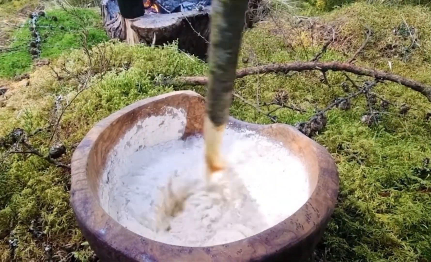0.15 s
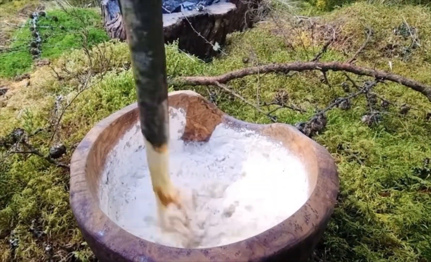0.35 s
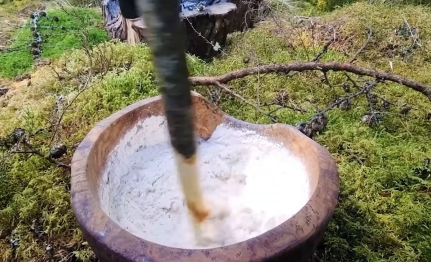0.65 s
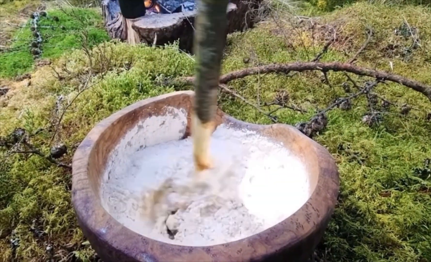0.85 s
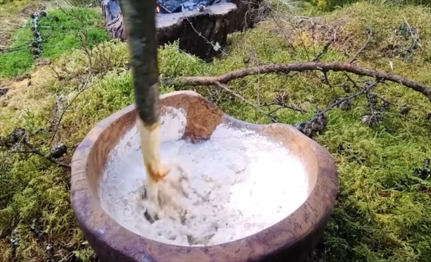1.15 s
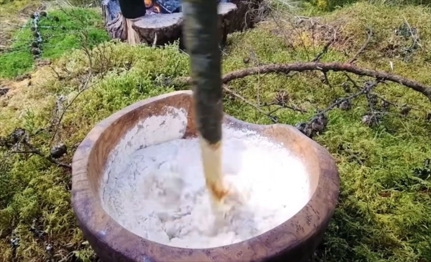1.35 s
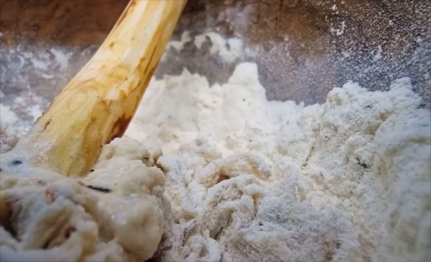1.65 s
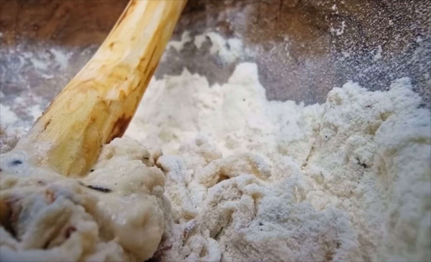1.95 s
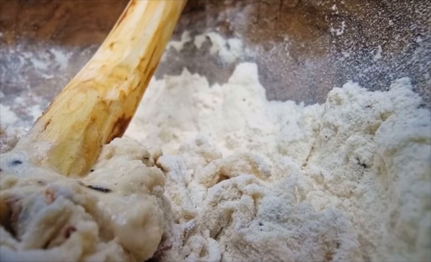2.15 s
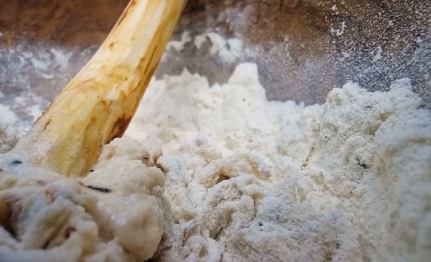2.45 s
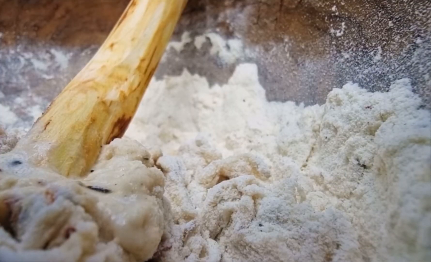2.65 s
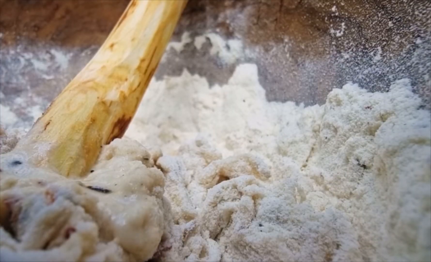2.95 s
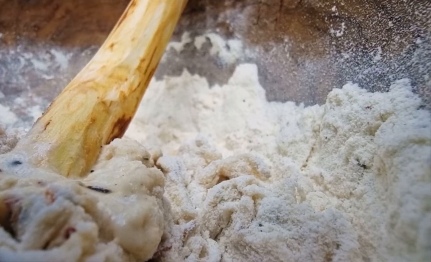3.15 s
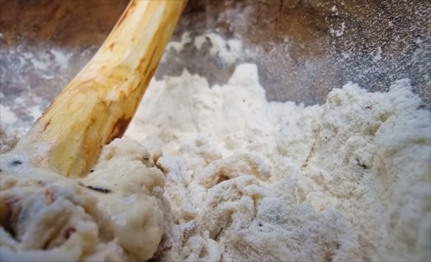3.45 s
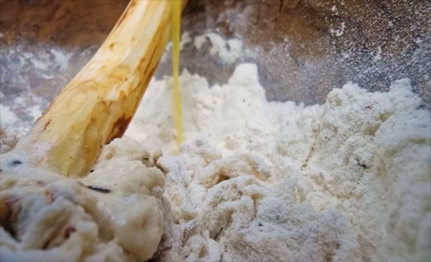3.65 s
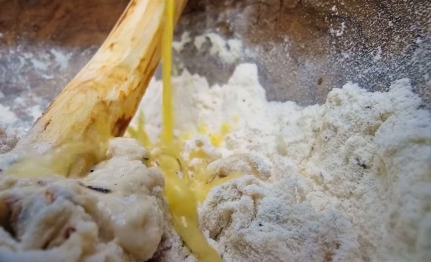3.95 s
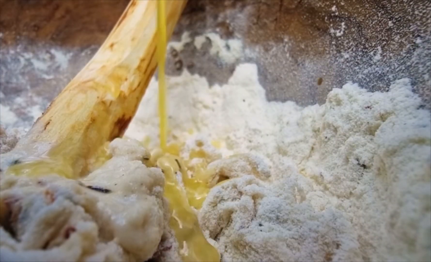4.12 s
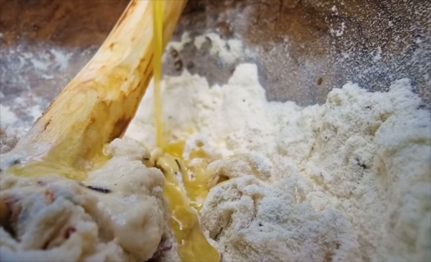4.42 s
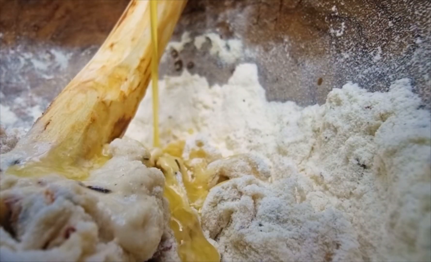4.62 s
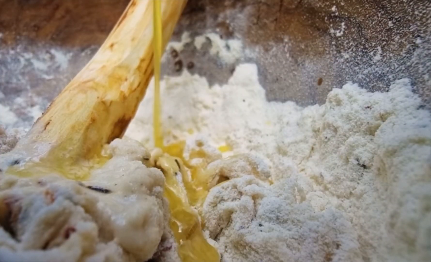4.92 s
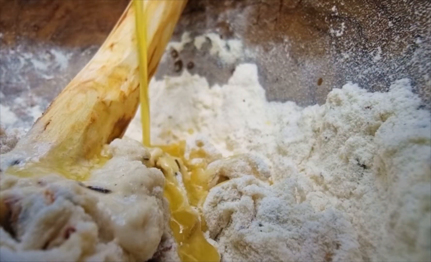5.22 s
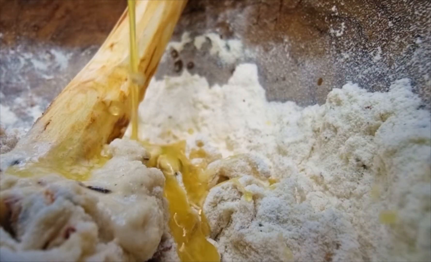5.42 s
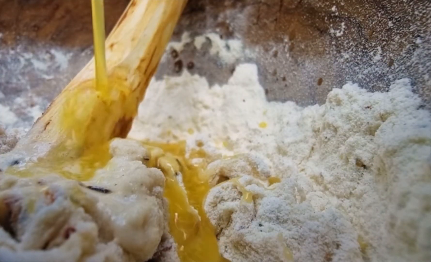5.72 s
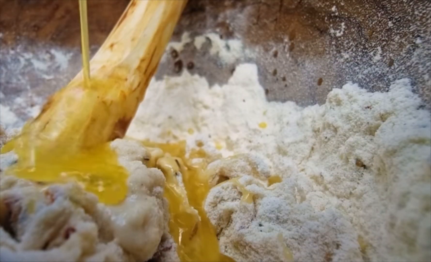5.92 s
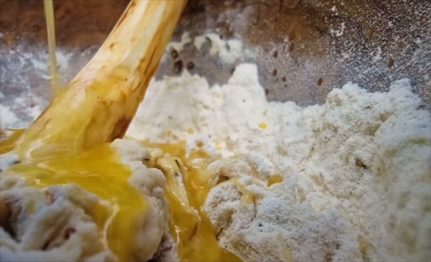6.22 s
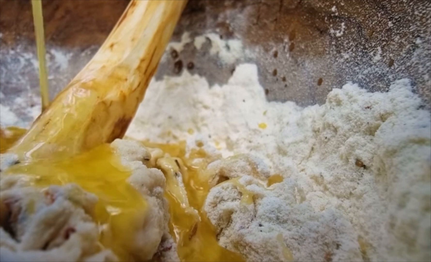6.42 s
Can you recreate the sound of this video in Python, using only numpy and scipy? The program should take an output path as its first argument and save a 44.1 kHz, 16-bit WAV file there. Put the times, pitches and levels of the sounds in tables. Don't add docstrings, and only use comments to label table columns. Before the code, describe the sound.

A quiet outdoor place, heard in stereo, with a low, lumpy distant hum and faint woodland rustle. From 0 to 1.7 s a stick rubs floury batter and wood from above, slightly left: a longer opening scrape, then short uneven strokes, tiny squeaks and a crisp snap around 0.45 s. A far bird gives soft two-note chirps from 1.2 to 1.7 s. At about 1.7 s the listening point jumps close to the bowl. Soft sticky pops and crackles gather from 2 s, scattered left and right, with faint wooden knocks. Birds whistle and chirp quickly from 2.5 to 4.4 s, mostly after 3.1 s. Around 3.75 s the wetness surges; a loud round pop hits at 3.95 s. Dense snapping, fizzing, low gulps and woody ringing continue in bunches from 4.3 to 5.6 s, then thin to sparse, softer sticky clicks by 6.5 s.

```python
import sys
import numpy as np
from scipy import signal
from scipy.fft import irfft
from scipy.io import wavfile
from scipy.ndimage import uniform_filter1d

SR = 44100
rng = np.random.default_rng(int(sys.argv[2]) if len(sys.argv) > 2 else 0)


def magnitude_from_level(level_db):
    exponent = np.asarray(level_db, float) / 20
    return 10 ** exponent


def master_out(mix):
    frames = np.transpose(np.atleast_2d(mix))
    ceiling = np.clip(frames, -1, 1)
    pcm = np.round(ceiling * 32767).astype(np.int16)
    wavfile.write(sys.argv[1], SR, pcm)


N = 290178

CUT_S = 1.725
LEFT_RIGHT = np.array([[1], [-1]])

# t/s, level/dB
HUM_LEVEL = [(0, -55), (1.3, -53), (1.7, -55), (1.8, -58), (3.9, -59), (4.2, -63), (6.58, -61)]
# f/Hz, level/dB per Hz
HUM_TONE = [(18, -22), (35, -52), (55, 0), (72, 1.5), (100, 0), (140, -10.5), (220, -20.5), (400, -36)]
# f/Hz, likeness/0-1
HUM_LIKENESS = [(30, .35), (90, 0.68), (200, 0.6), (350, 0.068)]
# f/Hz, level/dB per Hz
RUSTLE_TONE = [(120, 7.5), (550, 7.5), (1000, 13.5), (1900, -8), (3200, -7), (5500, 2.5), (8500, -24),
               (16500, -11)]

# t/s, length/s, first f/Hz, last f/Hz, level/dB
BIRD_NOTES = [
    (2.469, 0.071, 4270, 4400, -57.5),
    (2.846, 0.023, 5000, 5340, -64),
    (2.895, 0.12, 4310, 4340, -62),
    (3.262, 0.03, 4130, 4400, -46),
    (3.45, 0.029, 5000, 4900, -50),
    (3.639, 0.04, 2346, 3610, -43),
    (3.663, 0.049, 3594, 3563, -42),
    (3.781, 0.021, 2990, 3470, -45.5),
    (3.832, 0.088, 3920, 4550, -48),
    (4.287, 0.079, 4070, 4400, -48),
]
# delay/s, length/s, first f/Hz, last f/Hz, level/dB
FAR_FIGURE = [
    (0, 0.047, 3890, 4350, -13.5),
    (.04, 0.06, 3390, 2943, -9),
]
# t/s, level/dB, pitch/ratio
FAR_REPEATS = [
    (1.177, -50.5, 0.95),
    (1.336, -47.5, 0.97),
    (1.51, -50, 1.001),
    (1.624, -48.5, 1.12),
]
# delay/s, length/s, first f/Hz, last f/Hz, level/dB
NEAR_FIGURE = [
    (0.00134, 0.024, 3950, 4280, 1),
    (0.018, 0.016, 4850, 4900, -3.5),
    (0.033, 0.071, 4700, 3200, -7.5),
    (0.028, 0.0545, 3800, 3200, -6),
]
# t/s, level/dB, pitch/ratio
NEAR_REPEATS = [
    (3.133, -43, 0.95),
    (3.308, -40.5, 0.91),
    (3.495, -45.5, 0.92),
]

# f/Hz, level/dB per Hz
RUB_TONE = [(1500, -6), (3000, 1), (5000, -3.5), (7000, 1), (8500, -10), (11000, -16.5), (14000, -8),
            (16500, -31)]
# f/Hz, level/dB per Hz
WOOD_TONE = [(150, 5.5), (300, -25), (550, 9), (800, -1.5), (1150, 4.5), (1600, -1), (2200, -9),
             (4000, -70)]
# t/s, hold/s, rub level/dB, wood over rub/dB
STROKES = [
    (0, 0.095, -49, -8.5),
    (.4, 0.029, -50.5, 5),
    (.47, 0.0026, -48, -16),
    (.62, 0.032, -60, -4),
    (.81, 0.0073, -48.5, -17),
    (.93, 0.012, -56, -17),
    (1.14, 0.068, -57.5, -5),
    (1.39, 0.047, -52.5, -1),
    (1.59, 0.086, -54.5, -2.5),
    (1.69, 0.0052, -70, 12),
]

# f/Hz, left level/dB, right level/dB
PORTS = [(1760, 1.5, -11.5), (2700, 0, 1.5), (4400, 2, 0), (6430, -5.5, 0.5), (6280, 2.5, 4.5),
         (9400, -8.5, -5.5), (14800, -5.5, -4), (17800, -29, -8)]
# f/Hz, width/Hz, level/dB, right port phase/turns
BOWL = [
    (519, 130, -1, 0.17),
    (1008.5, 6.8, 0, 0.55),
    (1090, 190, 5, 0.63),
    (1665, 52, -4.5, 0.45),
    (2750, 620, 3.5, 0.95),
]
# t/s, f/Hz
MOVING_NOTCH = [(1.7, 2440), (2.6, 2010), (3.6, 1870), (4.1, 1540), (4.8, 1540), (5.5, 1740), (6.58, 2170)]

# t/s, peak level/dB, f/Hz
GLUGS = [(0.451, -44, 244), (3.713, -36, 424), (3.795, -23.5, 455), (3.871, -32, 474), (3.945, -33.5, 243),
         (4.116, -31, 493), (4.383, -34.5, 196), (4.399, -29, 310), (4.457, -41, 350), (4.528, -30, 416),
         (5.059, -27, 466), (4.74, -45, 232), (5.84, -47, 228)]
# t/s, peak level/dB, f/Hz, left over right/dB
PLOPS = [(.785, -29.5, 6130, 15), (1.8061, -31, 3050, 8), (1.9693, -29, 4440, 15), (2.0353, -31.5, 5560, 3),
         (2.1129, -31.5, 3060, 29.5), (2.361, -26, 7200, -2), (2.373, -25, 3440, -35.5),
         (2.439, -34, 2940, 30), (2.4887, -24.5, 2700, -11), (3.1037, -31.5, 6650, -26),
         (3.2176, -28.5, 6740, -35.5), (3.233, -22, 2760, 12), (3.261, -18, 6700, -10),
         (3.9474, -1, 3420, 4), (4.3002, -14.5, 3480, -1), (4.7352, -12.5, 2400, -16.5),
         (5.1452, -13.5, 4940, -13), (5.2048, -16, 2930, 3), (5.3147, -12.5, 6030, -28),
         (5.446, -12, 3850, 4), (6.263, -21, 2700, -2)]
# t/s, peak level/dB, f/Hz, left over right/dB
BURSTS = [(.388, -31, 5300, 17), (.6167, -32, 2860, 13.5), (.8044, -30.5, 3100, 16),
          (.9397, -29.5, 5900, 20), (2.164, -25.5, 5500, 2), (2.51, -20.5, 2970, 0),
          (2.8812, -22.5, 6700, -9), (2.998, -23.5, 7050, -9), (3.3163, -31, 3760, 32),
          (3.7518, -16, 3850, 2), (3.88, -12.5, 3950, -3), (4.4008, -10.5, 3880, 6),
          (4.4448, -19, 4630, -17), (4.7641, -15.5, 5350, 4), (4.8246, -14.5, 5170, 0),
          (5.3884, -9.5, 4820, 0), (5.416, -15, 5270, -12), (5.4368, -21, 3760, -20),
          (5.4867, -16.5, 4100, -6), (5.5149, -19.5, 3800, -7), (5.7644, -17.5, 3580, 0),
          (5.9916, -20, 2690, -6.5), (6.1054, -29, 2750, -1), (6.3583, -24.5, 3730, -7)]
# t/s, peak level/dB, f/Hz, left over right/dB
SNAPS = [(.4544, -13.5, 6400, 5.5), (1.544, -25, 6240, 4), (2.0923, -27, 2840, -4), (2.3243, -35, 5760, 1),
         (2.7257, -25.5, 2800, 2), (2.796, -25.5, 4800, 2), (3.9474, -20.5, 4630, -22),
         (4.3635, -16.5, 7800, -5), (4.3834, -10.5, 4630, 0), (4.4578, -11, 3600, 4),
         (4.5295, -12.5, 2900, 1), (4.572, -14.5, 4400, -3), (4.6007, -19, 3670, 3),
         (4.8522, -24, 3570, -1), (4.8757, -14, 6460, -5), (4.8863, -18.5, 2430, -5),
         (4.9061, -20.5, 6000, -8), (4.9508, -14.5, 3220, -3), (5.062, -14.5, 3630, 1),
         (5.1452, -14.5, 4200, 7), (5.6428, -15, 5080, -4), (5.738, -25.5, 4130, -3),
         (5.8003, -30, 2750, 8), (6.3789, -22.5, 3170, -4), (6.435, -28, 5300, 9), (6.4945, -28, 4900, -5)]
# t/s, peak level/dB, f/Hz, left over right/dB
BLIPS = [(2.2722, -29, 2950, -6), (2.393, -32, 2940, -9), (2.525, -24.5, 3040, 2.0),
         (2.6113, -24.5, 2780, 4), (2.6419, -34, 2340, 3), (2.7374, -35, 2850, 9), (2.8048, -30, 2960, -7),
         (2.9468, -22.5, 2800, 8), (3.056, -27.5, 2330, 14), (3.0774, -34, 2180, 0),
         (3.1133, -29, 6690, -13), (3.3264, -27, 4100, 2.5), (3.4234, -26, 2850, 21),
         (3.5698, -42, 3930, 1.5), (3.7354, -26, 3960, 0.5), (3.769, -18, 3470, -2.0),
         (3.7952, -23, 3640, -5), (3.8524, -16, 2820, -4), (3.8745, -5.5, 4050, -1.5),
         (3.898, -12, 2750, -2.0), (3.9127, -26, 3470, 7), (4.0177, -20.5, 2510, -1.5),
         (4.1664, -18, 4100, 2), (4.2263, -28, 2920, 0.5), (4.2757, -31, 3810, -2), (4.585, -21, 3800, 0.0),
         (4.6139, -19.5, 2230, -5), (4.6379, -31, 3840, -1.0), (4.7158, -17.5, 2350, -1.5),
         (4.7439, -17, 2490, -1.0), (4.8324, -28, 3870, -3), (4.9622, -22, 3600, 6),
         (5.0286, -16.5, 3960, -5), (5.1002, -25, 4080, -1.5), (5.11, -20.5, 7500, -1.0),
         (5.134, -17, 3020, -4), (5.2584, -30, 3700, -4), (5.288, -15, 3900, -4.0), (5.331, -19, 5200, -7),
         (5.3472, -23, 7470, -7), (5.4614, -17, 3880, -4), (5.4994, -26, 3470, 11), (5.629, -24, 5240, -3),
         (5.7034, -41, 2720, -6), (5.9274, -41, 2900, -11), (6.044, -39, 2860, -6),
         (6.1958, -33, 4300, -0.5), (6.314, -29, 5200, -1.0), (6.4015, -25, 2860, 2),
         (6.5237, -30.5, 4260, -2.0)]
# t/s, peak level/dB, f/Hz, left over right/dB
TICKS = [(2.2473, -36, 6640, 3), (2.5835, -33, 2710, 2), (2.8245, -40, 6540, 0), (2.8709, -33, 7040, -4.0),
         (3.1303, -29, 4160, -2), (3.4094, -26, 7800, -3), (3.4274, -37, 2890, -1), (3.478, -32, 4520, -3),
         (3.5374, -28, 3720, -3), (3.9983, -30, 4320, 11), (4.1135, -24, 7700, 1), (4.4124, -19, 2300, 0.5),
         (4.4734, -22, 2340, 1), (4.5067, -13.5, 4430, 1), (4.5506, -20, 2020, -1),
         (4.5764, -25, 3810, 0.0), (4.6718, -30, 2400, -7), (4.7072, -26, 2440, 0.0),
         (4.7734, -27, 5800, -12), (4.9267, -23, 3820, -4), (4.9454, -31, 3700, -1),
         (5.0155, -21, 3490, 0.5), (5.0524, -33, 3970, -3), (5.0868, -32, 4100, -0.5),
         (5.2774, -29, 2920, -0.5), (5.4244, -26, 3920, 2), (5.4784, -24, 3780, -2.0),
         (5.5273, -18, 6600, -4.5), (5.5374, -19, 5050, 0), (5.5772, -31, 4240, -5),
         (5.6014, -25.5, 2890, -4), (5.8172, -27.5, 2880, 1)]
# t/s, peak level/dB, f/Hz, left over right/dB
CHIRPS = [(0.0894, -38, 6380, 1.5), (0.1444, -42, 7080, 4.5), (0.2094, -42, 5840, 12),
          (0.305, -39, 5720, 4), (0.403, -33, 5350, 7), (0.6394, -53, 6310, 2.0), (0.824, -38, 6850, 6),
          (0.8954, -32, 5870, -2.0), (0.9994, -46, 5620, 3.0), (1.0694, -47, 5000, 5),
          (1.1902, -31, 6560, 8), (1.2565, -42, 7220, 5.0), (1.3694, -32, 6950, 1.0),
          (1.4301, -30, 7000, 2), (1.6187, -30, 5800, -1.0), (1.7, -44, 4840, -1.0),
          (1.8794, -55, 5190, -3.5), (1.9994, -46, 7520, 1.0), (2.1944, -42, 6530, -1.0),
          (2.4094, -37, 7290, -3.0), (2.6594, -49, 5660, -1.5), (2.6894, -41, 4910, -1.0),
          (2.9138, -50, 7830, -3.0), (3.03, -39, 5330, -3.0), (3.327, -29, 6490, -15),
          (3.426, -35, 6760, -4), (3.48, -25, 5720, -4.5), (3.5264, -30, 6620, -12),
          (3.5698, -29, 6570, -9), (3.653, -39, 5000, -3.0), (3.705, -34, 6880, -1.5),
          (3.7683, -14, 7820, -5), (3.8222, -17, 5900, -5.0), (4.0751, -25, 7600, -2.0),
          (4.088, -31, 7350, -3.0), (4.6194, -31, 5940, -1), (4.8878, -11, 7600, -1),
          (5.9269, -31, 7800, 0)]

# t/s, hold/s, effort level/dB, fizz over effort/dB
SQUEEZES = [(2.11, 0.049, -52.5, -11), (2.2, 0.012, -62, 4), (2.38, 0.011, -53.5, -14),
            (2.51, 0.057, -49, -3), (2.6, 0.12, -49.5, -3.5), (2.85, 0.15, -46.5, -8),
            (3.07, 0.033, -42, -2), (3.2, 0.031, -44.5, -9), (3.33, 0.19, -43, -3),
            (3.48, 0.032, -42.5, -10), (3.62, 0.044, -43.5, -0.5), (3.77, 0.028, -33.5, -1.5),
            (3.84, 0.09, -35, -3), (4.12, 0.022, -38.5, -1.5), (4.2, 0.099, -45.5, -8),
            (4.33, 0.074, -35.5, 1), (4.48, 0.21, -39, -1.5), (4.75, 0.057, -40.5, -6),
            (4.9, 0.23, -44.5, 0.5), (5.25, 0.14, -44, 1), (5.43, 0.03, -36.5, -10),
            (5.52, 0.024, -47.5, 0), (5.6, 0.074, -48, 0.5), (5.8, 0.0038, -48, -7), (6, 0.0043, -47.5, -3),
            (6.08, 0.056, -51.5, -4), (6.27, .01, -47.5, -4), (6.41, 0.027, -48, 3), (6.54, .04, -47, -6)]
# t/s, hold/s, ring level/dB, wood drag over ring/dB
PRESSES = [(2.2, 0.062, -64, -20), (2.6, 0.021, -51.5, -20), (3.71, 0.19, -41, -11),
           (3.85, 0.058, -42.5, -11), (4.12, 0.028, -58, 1.5), (4.21, 0.078, -45, -29),
           (4.34, 0.13, -50.5, 2), (4.5, 0.1, -45.5, -0.5), (4.89, 0.068, -49, 2), (5.05, 0.011, -44.5, -1),
           (5.17, 0.064, -51, 3), (5.67, 0.0084, -48.5, -2), (5.8, 0.012, -59, 4.5),
           (6.05, 0.032, -51, -21), (6.27, 0.006, -46.5, -6), (6.42, 0.043, -51.5, 3)]
EFFORT_REST_DB = -61.5


def evened(x):
    return x / np.sqrt(np.mean(x ** 2) + 1e-20)


def read(points, hz, column=1):
    table = np.transpose(points)
    return np.interp(np.log(hz + 1), np.log(table[0] + 1), table[column])


def over_time(rows):
    s, values = np.transpose(rows)
    return np.interp(np.arange(N) / SR, s, values)


def band(x, lo_hz, hi_hz):
    return signal.sosfilt(signal.butter(3, [lo_hz, hi_hz], "band", fs=SR, output="sos"), x)


def close():
    return np.clip((np.arange(N) / SR - CUT_S) / 0.0031, 0, 1)


def hiss(tone, likeness, lag_s, patchy_db, flicker_db, size=512):
    frames = N * 4 // size + 5
    hz = np.fft.rfftfreq(size, 1 / SR)[:, None]
    a, b, c, d, patches = rng.standard_normal((frames, len(hz), 5)).T
    flicker = evened(uniform_filter1d(patches[0], size=3))
    patches = uniform_filter1d(patches, size=8, axis=0)
    patches = evened(uniform_filter1d(patches, size=14, axis=1))
    likeness = np.clip(likeness, 0, 1)
    right = a + 1j * b
    left = likeness * right * np.exp(-2j * np.pi * hz * lag_s)
    left = left + np.sqrt(1 - likeness ** 2) * (c + 1j * d)
    level_db = read(tone, hz) + patchy_db * patches + flicker_db * flicker
    spectra = np.array([left, right]) * magnitude_from_level(level_db)
    return evened(signal.istft(spectra, nperseg=size, noverlap=size * 3 // 4)[1][:, :N])


def lumps(depth_db):
    slow, quick = rng.standard_normal((2, N))
    swing = evened(evened(band(slow, 5.07, 34.3)) + 1.34 * evened(band(quick, 20.5, 129)))
    return evened(magnitude_from_level(depth_db * np.minimum(swing, 1.3)))


def swells(rows, rise_db_s, fall_db_s, rest_db):
    t = np.arange(0, N + 64, 64) / SR
    first, second = 0, 0
    for s, hold, db, over_db in rows:
        rise = rise_db_s * np.maximum(s - t, 0)
        fall = fall_db_s * np.maximum(t - s - hold, 0)
        power = magnitude_from_level(db - rise - fall) ** 2
        first = first + power
        second = second + power * magnitude_from_level(over_db) ** 2
    levels = [10 * np.log10(p + magnitude_from_level(r) ** 2) for p, r in zip((first, second), rest_db)]
    return [np.interp(np.arange(N) / SR, t, level) for level in levels]


def bubble(hz, cycles, glide):
    u = np.arange(int(4 * cycles * SR / hz)) * hz / SR / cycles
    swell = u * np.exp(1 - u) ** 2 / np.e
    return swell * np.sin(2 * np.pi * cycles * u * (1 + glide * (u / 2 - .5)))


def to_ports(x):
    hz = np.fft.rfftfreq(512, 1 / SR)
    delay_s = np.array([[.00052], [0]]) + 128 / SR
    tone = magnitude_from_level(np.array([read(PORTS, hz, column=1), read(PORTS, hz, column=2)]))
    path = irfft(tone * np.exp(-2j * np.pi * hz * delay_s))
    return signal.oaconvolve(x, path, axes=1)[:, 128:N + 128]


def bowl(blows):
    t, ring = np.arange(1500) / SR, 0
    for hz, width, db, turns in BOWL:
        phase = 2 * np.pi * (hz * t + np.array([[0], [turns]]))
        ring = ring + magnitude_from_level(db) * np.sqrt(width) * np.exp(-np.pi * width * t) * np.sin(phase)
    ring = band(ring, 475, 2190)
    return signal.oaconvolve(blows[None], ring / np.linalg.norm(ring[0]), axes=1)[:, :N]


def notched(x):
    turn = np.exp(2j * np.pi * np.cumsum(over_time(MOVING_NOTCH)) / SR)
    r = np.exp(-np.pi * 890 / SR)
    resonance = 2 * (turn * signal.lfilter([1 - r], [1, -r], x / turn)).real
    return x - close() * resonance


def air():
    likeness = read(HUM_LIKENESS, np.fft.rfftfreq(4096, 1 / SR))[:, None]
    hum_db = over_time(HUM_LEVEL) + 2.5 + .6 * LEFT_RIGHT
    hum = magnitude_from_level(hum_db) * hiss(HUM_TONE, likeness, 0, 2.2, 1.8, size=4096)
    rustle = magnitude_from_level(-57.0) * hiss(RUSTLE_TONE, 0.66, 0.000473, 0.35, 0.24)
    return hum + rustle


def birds():
    notes = list(BIRD_NOTES)
    for figure, repeats in ((FAR_FIGURE, FAR_REPEATS), (NEAR_FIGURE, NEAR_REPEATS)):
        for s, level, ratio in repeats:
            for delay, length, first_hz, last_hz, db in figure:
                notes.append((s + delay, length, first_hz * ratio, last_hz * ratio, level + db))
    song = np.zeros(N + SR)
    for (s, length, first_hz, last_hz, db), chance in zip(notes, rng.standard_normal((len(notes), 8000))):
        u = np.linspace(0, 1, int(length * SR))
        glide_hz = last_hz - first_hz
        blur_hz = 76 + 0.11 * abs(glide_hz)
        waver = evened(uniform_filter1d(chance, size=130))[:len(u)] * blur_hz
        tone = np.sin(2 * np.pi * np.cumsum(first_hz + glide_hz * u + waver) / SR)
        breath_db = 66 * uniform_filter1d(chance[::-1], size=500)[:len(u)]
        song[round(s * SR):][:len(u)] += magnitude_from_level(db + 8.0 + breath_db) * tone * signal.windows.tukey(len(u), .6)
    echo = rng.standard_normal((2, 9000)) * magnitude_from_level(-60 * np.arange(9000) / SR / 0.27)
    echo = magnitude_from_level(1.5) * echo / np.linalg.norm(echo[0])
    direct = signal.unit_impulse(9000, 20) * magnitude_from_level(1.5 * LEFT_RIGHT)
    return signal.oaconvolve(song[None], echo + direct, axes=1)[:, :N]


def scrape():
    rub_db, wood_db = swells(STROKES, rise_db_s=319, fall_db_s=294, rest_db=(-58, -54))
    rub = magnitude_from_level(rub_db + 5.0) * hiss(RUB_TONE, .5, -.00032, 2.6, 3.0)
    wood = magnitude_from_level(wood_db + 2.5) * hiss(WOOD_TONE, .75, -.00036, 2.0, 2.2)
    return (rub + wood) * (1 - close())


def flecks():
    size_db = -51.5 + 3.9 * np.minimum(rng.exponential(1, N), 3)
    size = (rng.random(N) < 49 / SR) * magnitude_from_level(size_db)
    kind, out = rng.integers(0, 16, N), 0
    for k, (cycles, glide, side) in enumerate(rng.random((16, 3))):
        shape = bubble(4200 * 2.4 ** (k / 16), 7 + 9 * cycles, 0.1 * (glide - .7))
        squeaks = signal.oaconvolve(size * (kind == k), shape)[:N]
        out = out + magnitude_from_level(16 * (side - .5) * LEFT_RIGHT) * squeaks
    return out * (1 - 0.11 * close())


def glugs():
    out = np.zeros(N + SR)
    for s, peak_db, hz in GLUGS:
        tone = bubble(hz, 1.07, 0.1)
        out[round(s * SR) - 100:][:len(tone)] += magnitude_from_level(peak_db + 6.5) * tone
    return magnitude_from_level([[-4.5], [2.5]]) * np.array([np.roll(out, 23), out])[:, :N]


def pops():
    high, blows = np.zeros((2, N + SR)), np.zeros(N + SR)
    t = np.arange(800) / SR - 200 / SR
    swell = np.where(t < 0, np.exp(t / 0.001), np.exp(-t / 0.0013) + 0.08 * np.exp(-t / 0.008))
    for table, fizz_db in [(PLOPS, -33), (BURSTS, -17.5), (SNAPS, -10), (BLIPS, -33), (TICKS, -12), (CHIRPS, -33)]:
        luck = rng.random((len(table), 3))
        puffs = rng.standard_normal((len(table), 3, 800))
        puffs = (puffs[:, :1] + 1.35 * puffs[:, 1:]) * swell
        sprays = magnitude_from_level(fizz_db + 4.5) * band(puffs, 6260, 21500)
        for (s, peak_db, hz, pan_db), (cycles, glide, knock), puff, spray in zip(table, luck, puffs, sprays):
            at = round(s * SR) - 140
            tone = bubble(hz, 1.27 + 3.4 * cycles, 0.018 + 0.14 * glide)[:600]
            tone = np.pad(tone, (170, 630 - len(tone)))
            burst = 0.42 * band(puff, hz / 1.19, hz * 1.325) + spray + tone
            high[:, at:at + 800] += magnitude_from_level(peak_db + pan_db / 2 * LEFT_RIGHT) * burst
            blows[at + 190] += magnitude_from_level(1.018 * peak_db + 13.6 * knock)
    return to_ports(high[:, :N]) + magnitude_from_level(-4.5) * bowl(blows[:N])


def knead():
    effort_db, fizz_db = swells(SQUEEZES, rise_db_s=142, fall_db_s=155, rest_db=(EFFORT_REST_DB, -69))
    press_db, drag_db = swells(PRESSES, rise_db_s=170, fall_db_s=127, rest_db=(EFFORT_REST_DB, -63))
    ring_db = 10 * np.log10(magnitude_from_level(press_db) ** 2 + magnitude_from_level(effort_db - 6) ** 2)
    clumps = lumps(4.37)
    slip_size = magnitude_from_level(1.9 * np.minimum(rng.exponential(1, N), 3.5))
    slips = (rng.random(N) < 1500 / SR) * slip_size * clumps
    kind, crackle = rng.integers(0, 16, N), 0
    for k, (pitch, cycles, glide, side) in enumerate(rng.random((16, 4))):
        shape = bubble(2900 * 2.9 ** ((k + pitch) / 16), 4.9 + 7.6 * cycles, 0.22 * (glide - .3))
        bubbles = signal.oaconvolve(slips * (kind == k), shape)[:N]
        crackle = crackle + magnitude_from_level(14 * (side - .5) * LEFT_RIGHT) * bubbles

    shared, *apart = rng.standard_normal((3, N))
    noise = shared + .9 * np.array(apart)
    wet = 0.54 * evened(band(noise * clumps ** 0.17, 2990, 3910))
    wet = wet + evened(band(noise * lumps(5.7), 3600, 8600))
    body = evened(evened(crackle) + 1.33 * wet)
    puff = magnitude_from_level(-60 * abs(np.arange(300) - 60) / SR / 0.0015)
    spray = signal.oaconvolve(slips, puff)[:N] * noise
    fizz = 1.8 * evened(band(spray, 5700, 22000))
    fizz = evened(fizz + evened(band(noise * lumps(7.7), 9000, 22000)))
    hollow = evened(band(noise * clumps ** 1.02, 2170, 2910))
    body = magnitude_from_level(effort_db + 1.5) * body + magnitude_from_level(ring_db + 2.5) * hollow
    high = to_ports(body + magnitude_from_level(fizz_db + 6.0) * fizz)

    shake = evened(evened(slips * np.sign(shared)) + .7 * evened(shared * clumps ** 1.3))
    ring = magnitude_from_level(4.5) * bowl(magnitude_from_level(ring_db) * shake)
    drag = magnitude_from_level([[-5.0], [2.5]]) * evened(band(noise * clumps, 107, 835))
    return (high + ring + magnitude_from_level(drag_db) * drag) * close()


def scene():
    return notched(knead() + air()) + birds() + scrape() + flecks() + glugs() + pops()


def band_limit(x):
    return signal.sosfilt(signal.butter(12, 16810, fs=SR, output="sos"), x)


def record(dry):
    limited = signal.oaconvolve(dry, signal.firwin(101, 15600, fs=SR)[None], "same")
    return band_limit(limited)


dry = scene()
out = record(dry)
master_out(out)
```